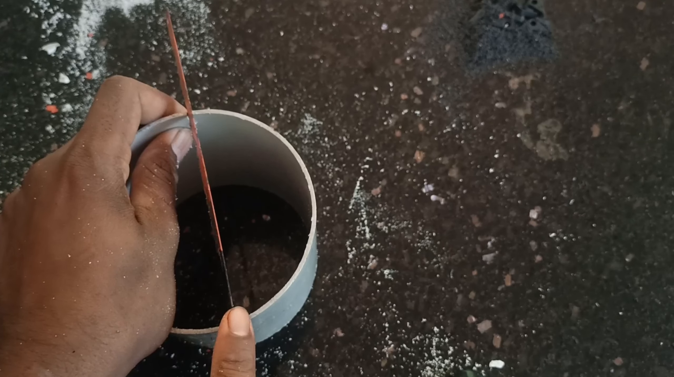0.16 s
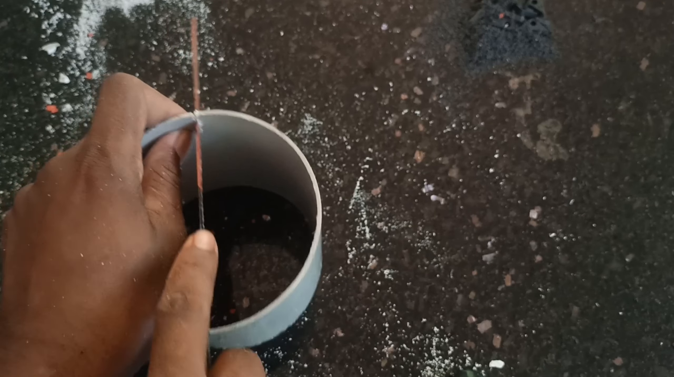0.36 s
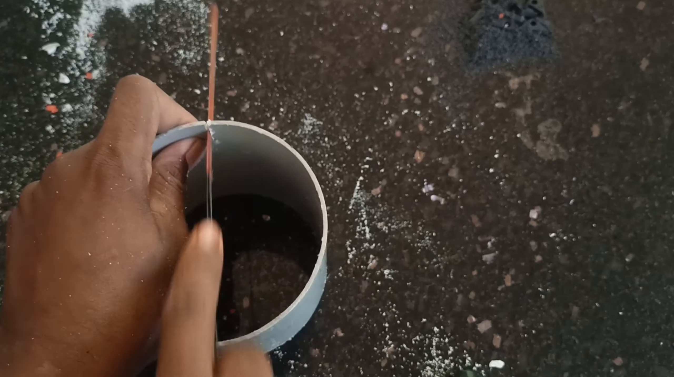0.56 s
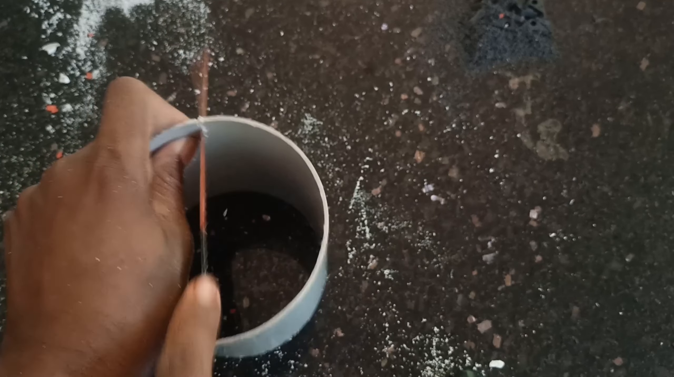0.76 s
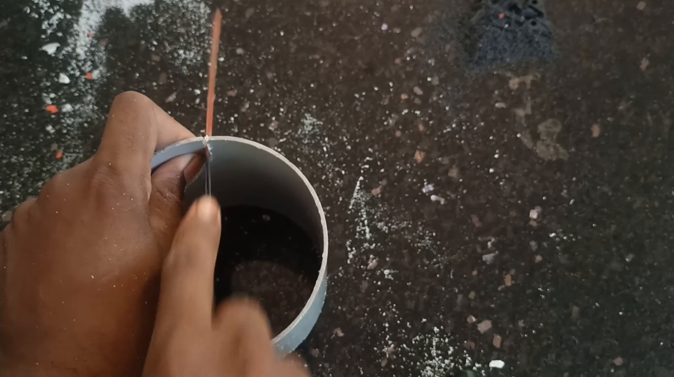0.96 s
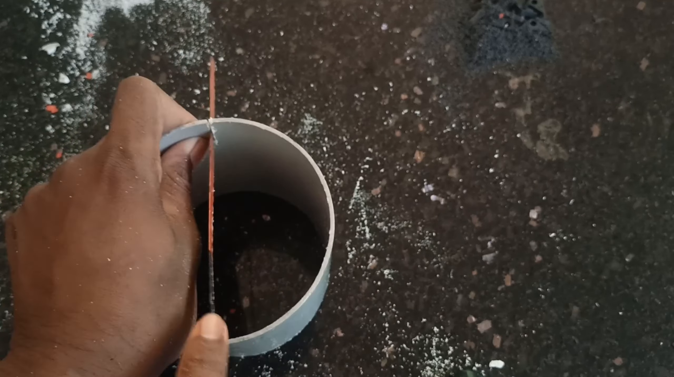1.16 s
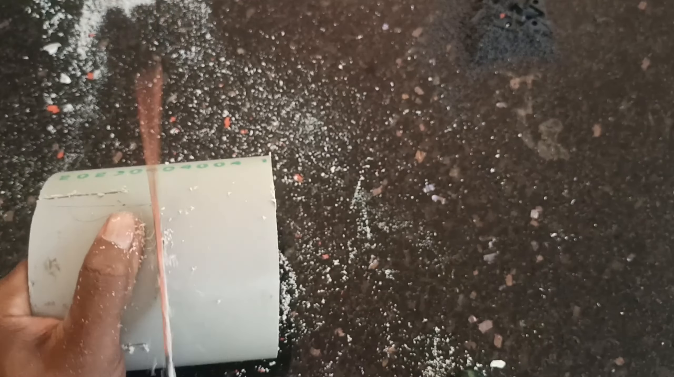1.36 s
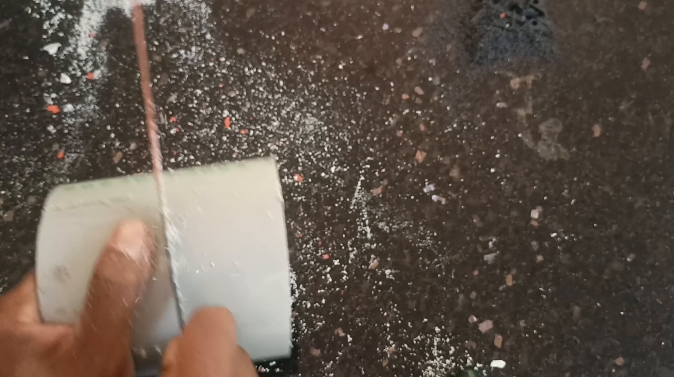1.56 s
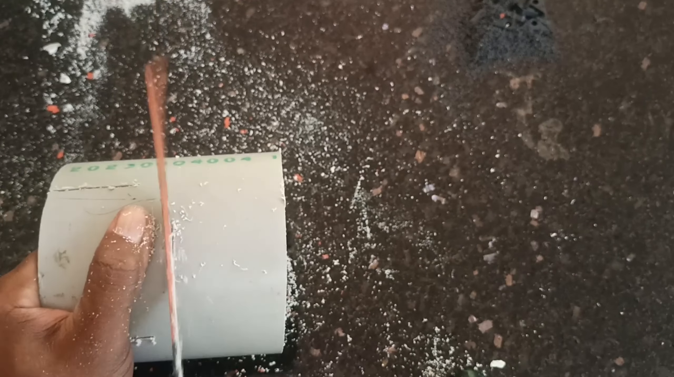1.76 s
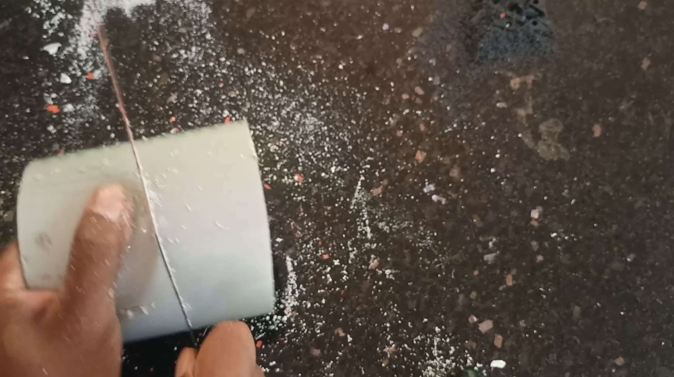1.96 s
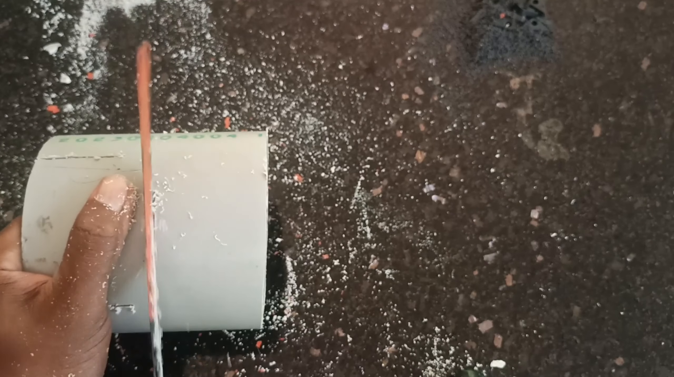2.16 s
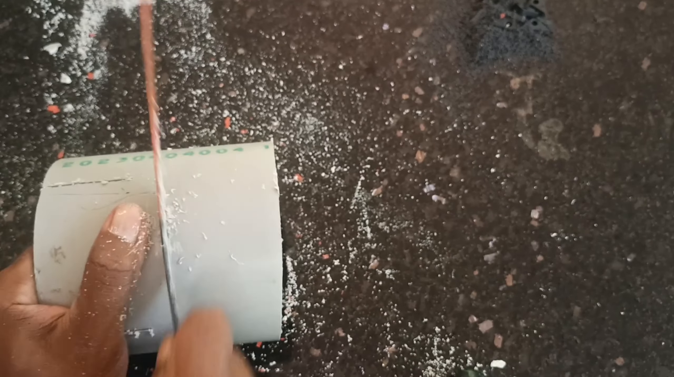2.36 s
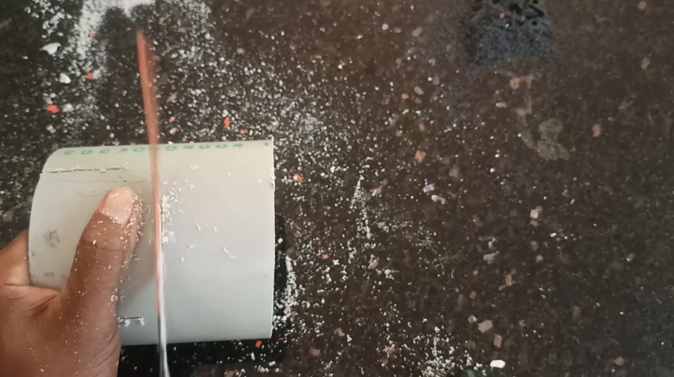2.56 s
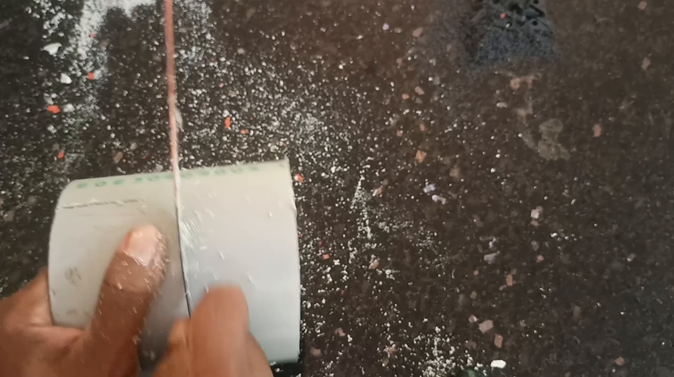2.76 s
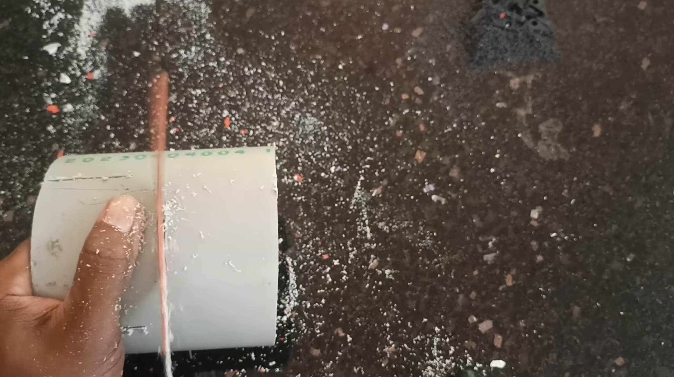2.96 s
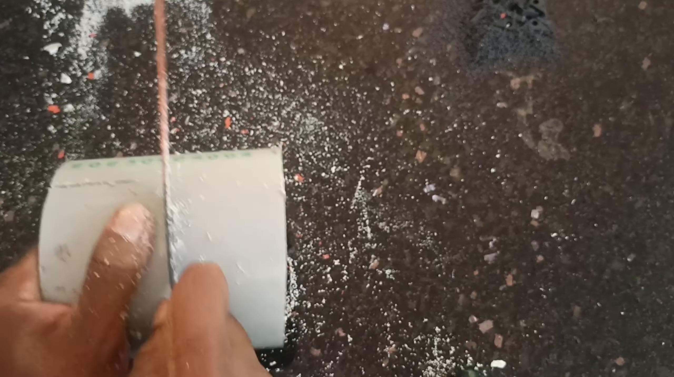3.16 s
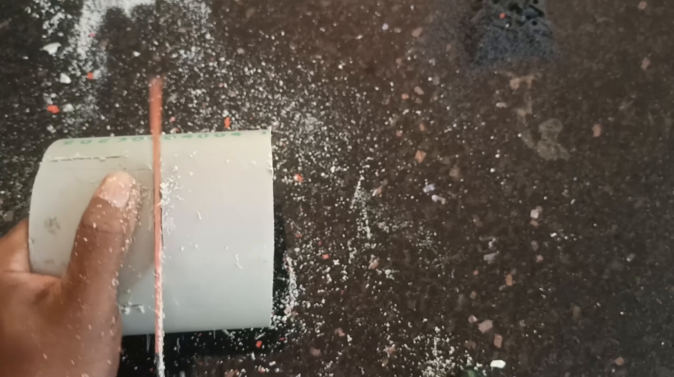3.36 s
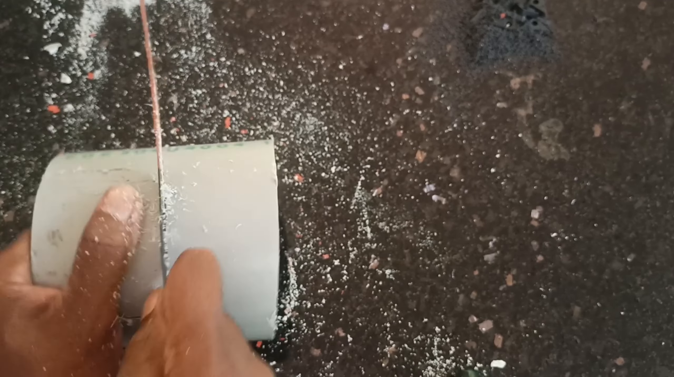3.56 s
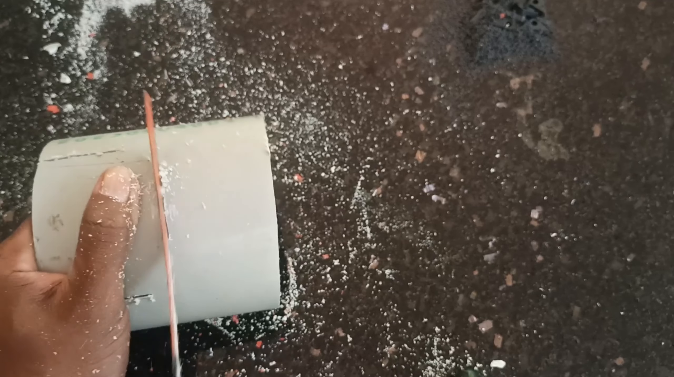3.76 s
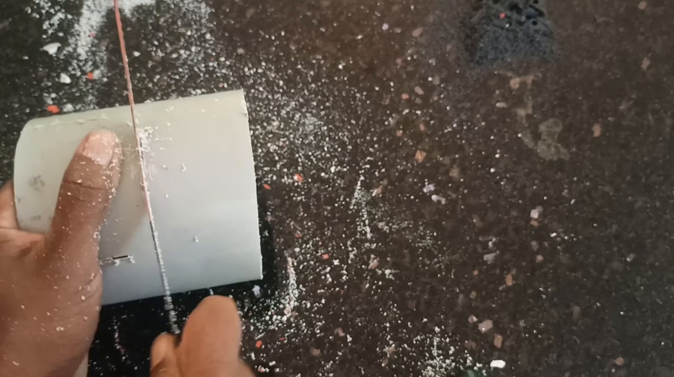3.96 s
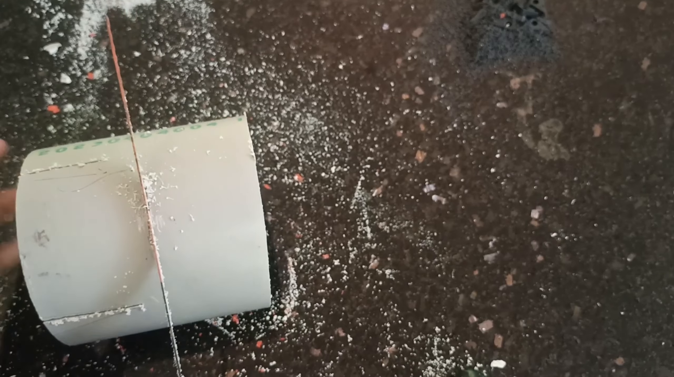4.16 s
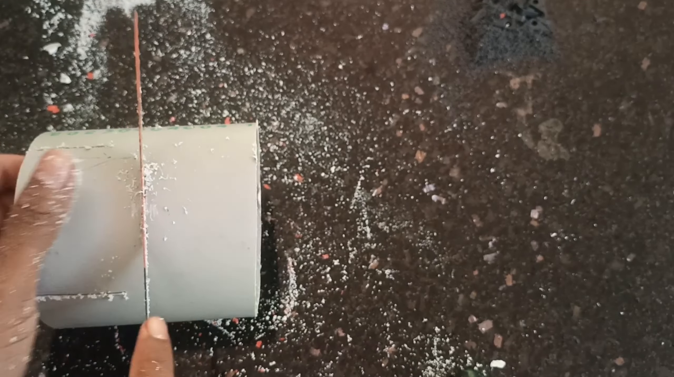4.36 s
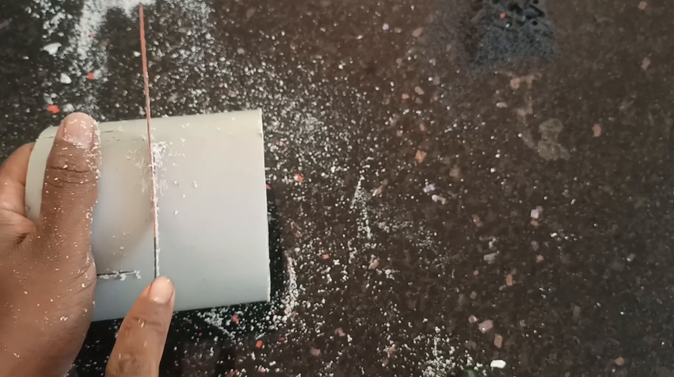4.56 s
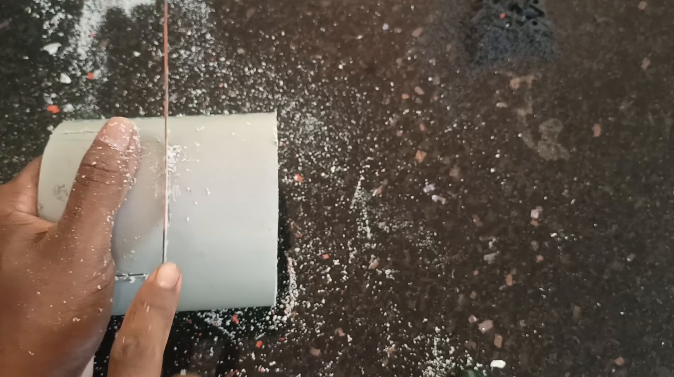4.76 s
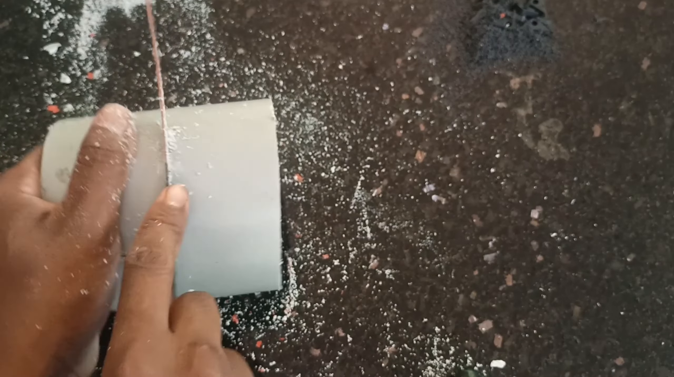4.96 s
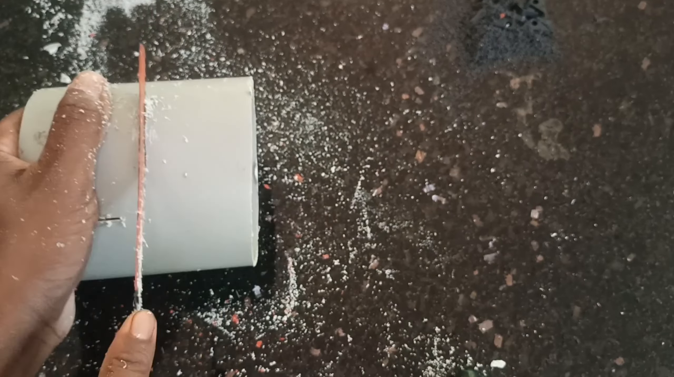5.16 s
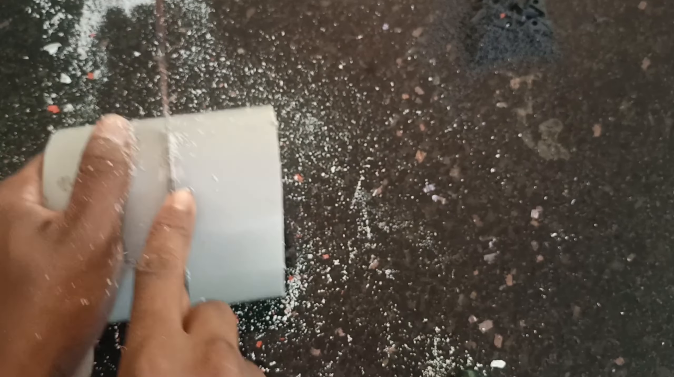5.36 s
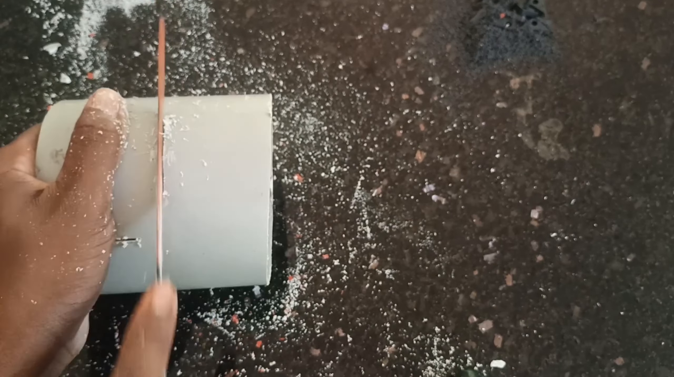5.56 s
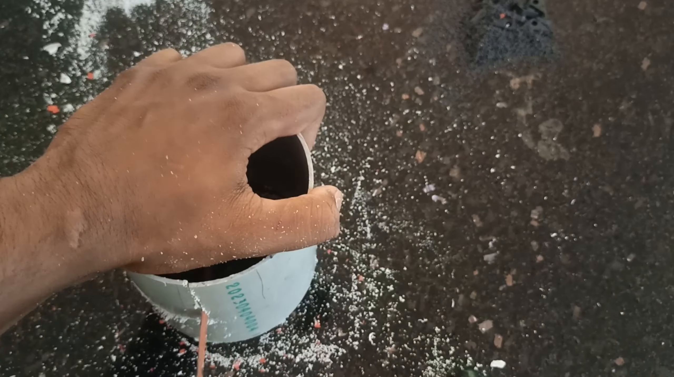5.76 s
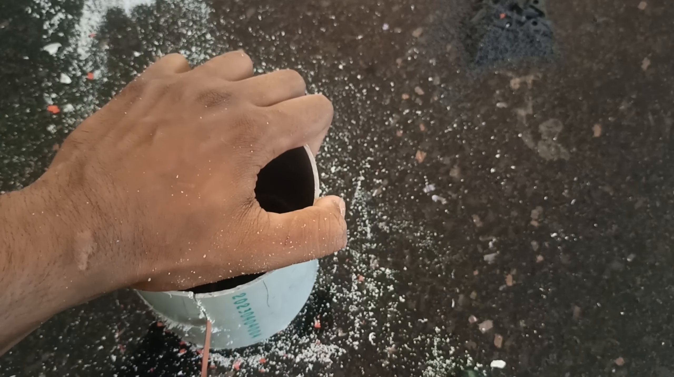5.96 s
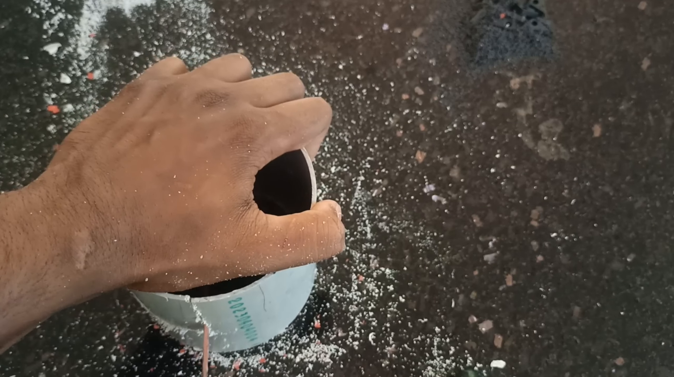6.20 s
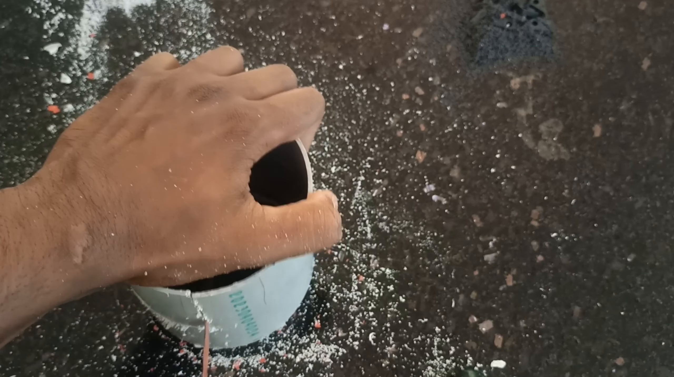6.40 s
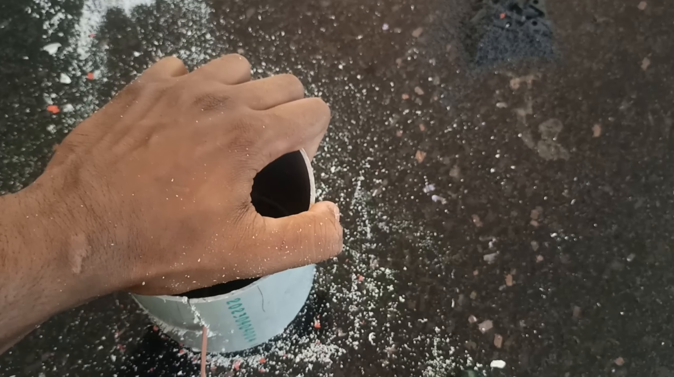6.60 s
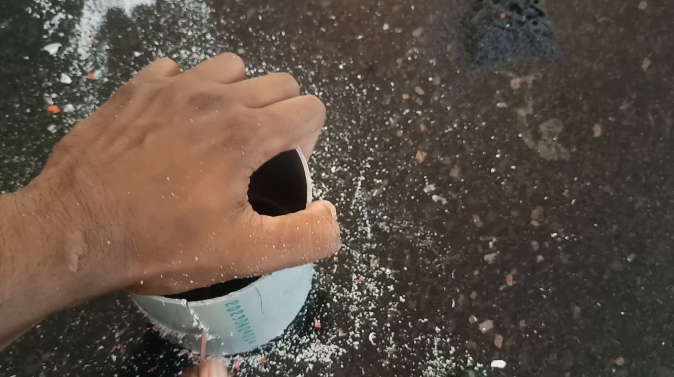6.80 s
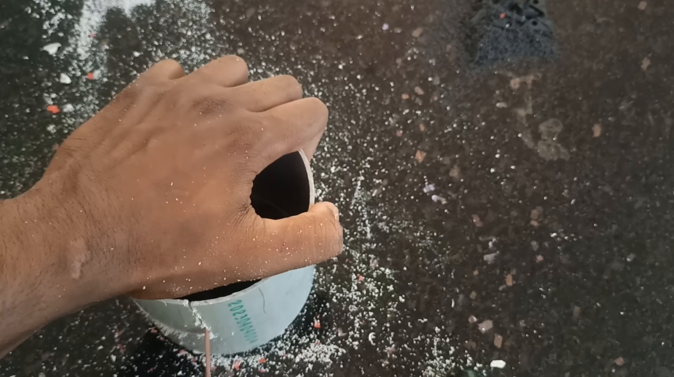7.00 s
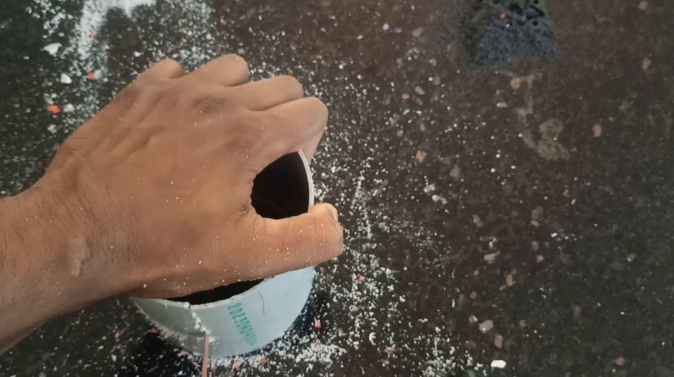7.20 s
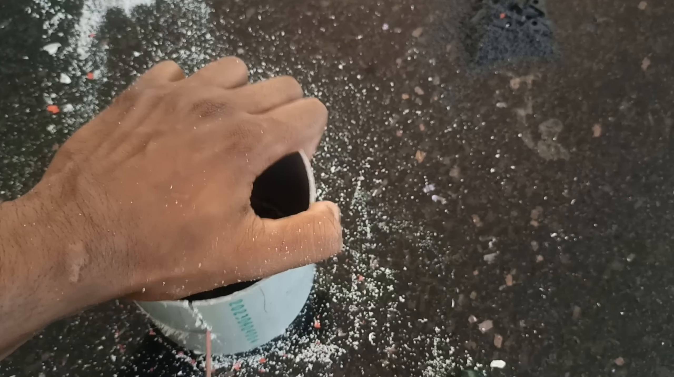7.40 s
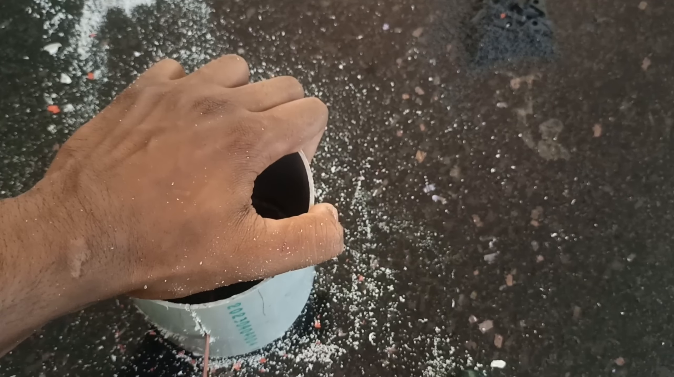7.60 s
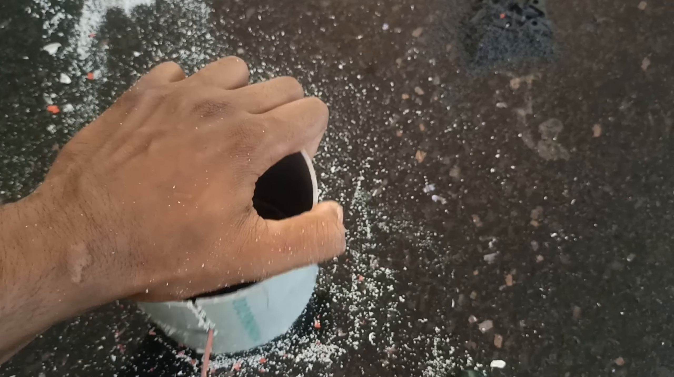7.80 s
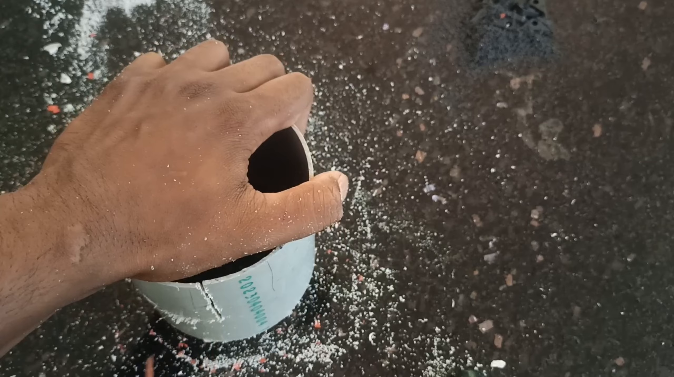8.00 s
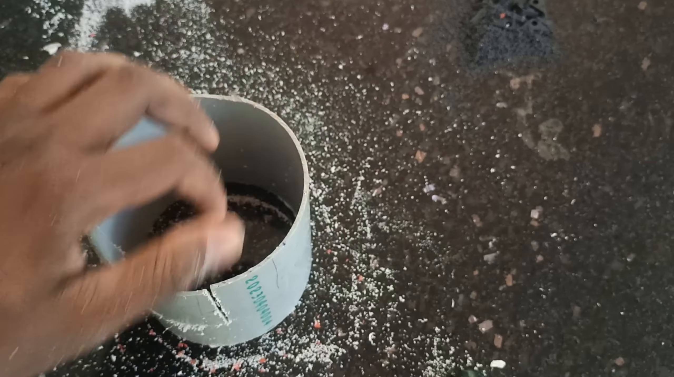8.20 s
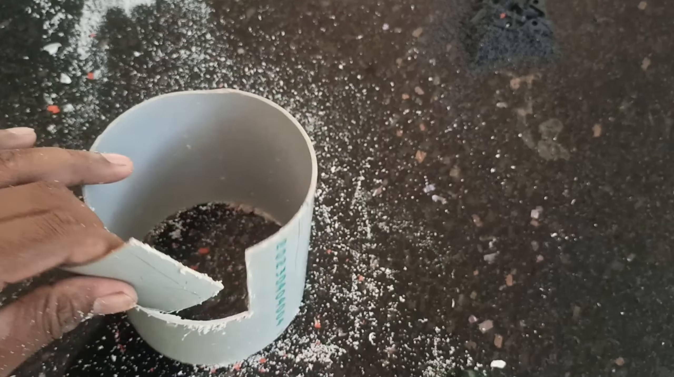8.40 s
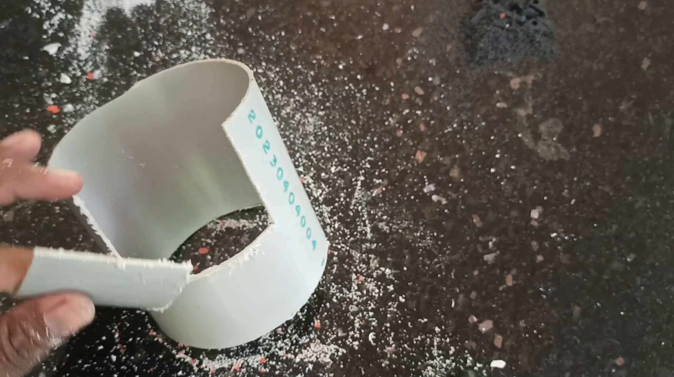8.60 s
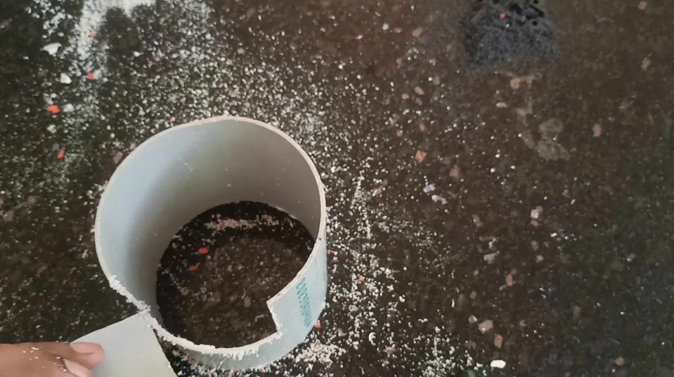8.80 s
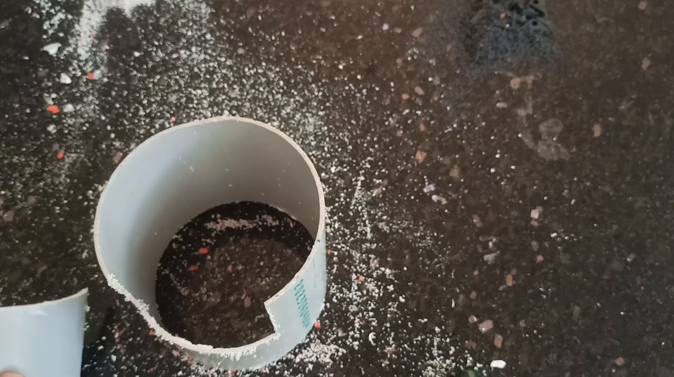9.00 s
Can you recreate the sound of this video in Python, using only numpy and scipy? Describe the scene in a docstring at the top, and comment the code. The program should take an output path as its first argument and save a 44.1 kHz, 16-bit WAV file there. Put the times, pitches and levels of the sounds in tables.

```python
"""A bare hacksaw blade saws a short plastic pipe on a hard floor, close under a one-microphone phone.
Teeth tear the plastic in dense random clicks that ring blade and pipe wall; now and then a tooth catches.
The pipe is held in four grips, each with its own resonances; the lying pipe also knocks at single pitches.
Behind it are filtered room noise with a low hum of air and a few far chirps made of two wavering tones.
Near the end the loose piece scuffs the floor, and is tapped down with two clicks that ring it."""
import sys
import numpy as np
from scipy import signal
from scipy.fft import rfft, irfft, next_fast_len
from scipy.io import wavfile
from scipy.ndimage import uniform_filter1d

SR = 44100
rng = np.random.default_rng(int(sys.argv[2]) if len(sys.argv) > 2 else 0)


def convert_level_to_amplitude(level_db):
    """Map a level in decibels to its linear amplitude factor."""
    exponent = np.asarray(level_db, float) / 20
    return 10 ** exponent


def pcm_store(signal):
    """Save signal as 16-bit PCM."""
    levels = np.round(np.clip(np.atleast_2d(signal), -1, 1) * 32767)
    wavfile.write(sys.argv[1], SR, levels.astype(np.int16).T)


N = 398663
T = np.arange(N) / SR  # time of every sample in seconds


def response(points, rings=(), size=8192):
    """Causal impulse response of a broad colour with resonant peaks, from the cepstrum of its log gain."""
    hz = np.maximum(np.arange(size // 2 + 1) * SR / size, 1)
    at, db = np.transpose(points)
    db = np.interp(np.log(hz), np.log(at), db)
    for centre, width, peak_db in rings:
        db = db + peak_db / (1 + (2 * (hz - centre) / width) ** 2)
    # folding the cepstrum onto positive times makes the sound start at once
    ceps = irfft(db * np.log(10) / 20)
    ceps[1:size // 2] *= 2
    ceps[size // 2 + 1:] = 0
    return irfft(np.exp(rfft(ceps)))


def unit_in(h, lo_hz, hi_hz):
    """Scale a response so that white noise leaves it with rms 1 between two frequencies."""
    hz = np.arange(len(h) // 2 + 1) * SR / len(h)
    power = np.abs(rfft(h)) ** 2
    in_band = (hz > lo_hz) & (hz < hi_hz)
    return h / np.sqrt(power[in_band].sum() / len(hz))


def walk(rate):
    """Random levels, a new one rate times a second, smoothed twice; their spread is near 1."""
    hold = int(SR / rate)
    steps = np.repeat(rng.standard_normal(N // hold + 1), hold)
    return 1.1 * uniform_filter1d(uniform_filter1d(steps, hold), hold)[:N]


def filtered(x, order, hz, kind):
    """Butterworth filter: keeps the lows, the highs or a band of the sound."""
    return signal.sosfilt(signal.butter(order, hz, kind, fs=SR, output="sos"), x)


# Colour of the room noise. Each row: frequency in Hz, relative level in dB per Hz.
ROOM_COLOUR = [(15, -57.5), (25, -25), (49, -15), (101, -10.5), (148, -4), (188, -11), (306, -11.5),
               (874, -23), (1270, -22.5), (2300, -26), (4200, -22.5), (6410, -23.5), (7540, -19.5),
               (10100, -30.5), (15600, -26.5)]
# Level of the room noise over time. Each row: time in seconds, level in dB before a slight waver.
ROOM_LEVELS = [(0, -47), (.1, -50.5), (1.2, -45.5), (1.3, -45), (4.05, -44.5), (4.12, -47), (4.7, -47),
               (5.6, -44.5), (7.9, -43), (8.3, -54.5), (8.74, -56.5), (8.8, -49), (9.04, -54.5)]


def background():
    """Room hiss and hum: white noise through the room colour, wavering slightly in level."""
    hiss = signal.fftconvolve(rng.standard_normal(N), response(ROOM_COLOUR))[:N]
    level_db = np.interp(T, *np.transpose(ROOM_LEVELS)) + 1.1 * walk(12)
    return hiss / hiss.std() * convert_level_to_amplitude(level_db)


# A tooth catches and lets go, or the pipe is knocked.
# Each row: time in seconds, relative rasp peak in dB, relative wall boom peak in dB.
CATCH_EVENTS = [(0.045,-46,-49),(0.3595,-26.5,-30),(0.4894,-27,-23),(.516,-22,-28),(.54,-22,-32),(0.5761,-16.5,-22),(.649,-20,-18),(0.683,-36,-20),(0.8127,-16,-21),(0.864,-22,-24),
                (0.9329,-24,-20),(.944,-21,-31),(1.001,-18.5,-26),(1.147,-34.5,-29.5),(1.306,-22.5,-50),(1.355,-15.5,-49),(1.368,-17,-44),(1.5023,-16,-50),(1.626,-16.5,-50),(1.757,-27.5,-43),(1.8865,-16,-52),
                (1.904,-22.5,-50),(1.9554,-30,-31),(2.011,-22,-28.5),(2.248,-24.5,-46),(2.2926,-15.5,-50),(2.313,-28,-40),(2.434,-23,-36),(2.569,-21,-46),(2.694,-20,-50),(2.8088,-24.5,-44),(2.835,-25,-45),(2.889,-26.5,-49.5),(2.952,-14.5,-49),
                (3.042,-22,-50),(3.174,-21.5,-51),(3.2248,-11.5,-50),(3.292,-20,-45),(3.361,-17,-42),(3.4239,-24,-30),(3.488,-21,-35),(3.614,-20.5,-40),(3.739,-22,-27),(3.809,-15.5,-29),(3.864,-19.5,-28),(3.875,-24,-32),
                (5.024,-27,-40),(5.318,-29,-41),(5.343,-33,-33),(5.363,-28,-33),(5.518,-31,-42),(5.5554,-30,-45),(5.7661,-47,-15),(5.9136,-25.5,-15.5),(6.0001,-23,-14.5),(6.048,-32,-8),(6.1019,-29,-11),(6.1282,-28.5,-13),
                (6.189,-22,-2),(6.2496,-19,-9.5),(6.266,-23.5,-14),(6.316,-32,-11),(6.357,-33.5,-8),(6.38,-21,-8),(6.509,-19,-9.5),(6.5759,-26.5,-9.5),(6.632,-48,-10),(6.7067,-25.5,-1),(6.766,-19.5,-12),
                (6.7863,-20,-9.5),(6.8506,-21,-2),(6.8923,-27,-9),(6.912,-18,-17),(6.978,-33,-9),(7.0205,-22,-9.5),(7.086,-35.5,-8.5),(7.1502,-22.5,-3.5),(7.04,-22,-12.5),(7.166,-24.5,-19),(7.174,-16,-17),(7.228,-30.5,-11),(7.298,-17,-16.5),(7.357,-23,-7),(7.407,-34,-10),
                (7.426,-16.5,-4.5),(7.451,-31,-18),(7.486,-23.5,-9),(7.497,-26.5,-8.5),(7.5509,-26,-8.5),(7.577,-22,-12),(7.68,-24,-2.5),(7.7,-18.5,-14),(7.811,-40,-20.5),(7.894,-37.5,-22),(7.901,-33,-14.5),(7.9156,-23,-10),(7.937,-41,-24),(8.106,-55,-31),
                ]


def catches(column, rise_s, fall_s, build_s=0, build_db=-9):
    """Short bursts of force: the load may build up first, lets go sharply and is quickly gone."""
    impulses = np.zeros(N)
    for row in CATCH_EVENTS:
        impulses[int(row[0] * SR)] = convert_level_to_amplitude(row[column])
    t = T[:2048]
    shape = (1 - np.exp(-t / rise_s)) * np.exp(-t / fall_s)
    force = np.convolve(impulses, shape / shape.max())[:N]
    if build_s:
        # a decay run backwards in time swells up to the catch
        swell = np.convolve(impulses[::-1], np.exp(-t / build_s))[:N][::-1]
        force = np.maximum(force, convert_level_to_amplitude(build_db) * swell)
    return force


# Each stroke of the saw, with faint fading tails at 7.797 and 7.964 seconds; the last four rows are
# the loose piece scuffing the floor.
# Each row: turn in seconds, usual time to full rasp in milliseconds, relative rasp level in dB,
# relative wall boom level in dB.
SAW_STROKES = [(.315,23.5,-36,-42.5),(.414,11,-27,-30),(0.482,25.5,-17.5,-25),(0.563,4.4,-19.5,-25),(.629,16,-18,-22),(.704,16,-18.5,-26),
               (0.774,17,-20,-23),(.862,2,-20.5,-26),(.909,4.2,-20,-25),(0.985,12,-19,-25),(1.271,2,-33,-41.5),(1.334,11,-22.5,-39.5),(1.417,2,-29.5,-40),
               (1.48,14,-29.5,-43),(1.54,4.4,-27,-40),(1.609,12,-30,-39.5),(1.671,2,-27.5,-37.5),(1.739,18.5,-23.5,-38.5),(1.808,2,-29,-42.5),(1.867,16,-24.5,-39.5),
               (1.936,2,-27.5,-40),(2.002,6,-28,-40.5),(2.07,13,-28.5,-38.5),(2.141,5.5,-29,-40),(2.2,41,-26.5,-40),(2.281,8.3,-25,-39.5),(2.346,3,-28,-42.5),
               (2.408,9.6,-21,-37),(2.473,1.6,-29,-39),(2.545,13,-27,-36.5),(2.628,2,-26,-39.5),(2.685,6,-23,-37.5),(2.747,21,-26.5,-40.5),(2.8,6.7,-23,-35),
               (2.877,8.8,-24.5,-37),(2.933,17,-23.5,-37),(3.003,13,-26,-39.5),(3.071,11,-25.5,-39.5),(3.135,12,-22.5,-36),(3.201,5.3,-24.5,-36),(3.268,20,-19.5,-36),
               (3.331,14,-24,-38),(3.398,6.8,-23.5,-33.5),(3.459,13,-23.5,-35.5),(3.525,18,-22.5,-31),(3.592,18,-19,-31.5),(3.656,2,-26,-31),(3.714,15,-21,-32.5),
               (3.777,10,-26,-32.5),(3.84,11,-25.5,-36.5),(3.914,9.6,-32.5,-38),(4.744,55,-40,-48.5),(4.856,14,-31,-36),(4.93,3,-29,-39),(4.995,20,-28,-44),
               (5.06,2,-36,-40.5),(5.136,9.8,-30,-40),(5.193,28,-26,-38),(5.275,7.5,-28.5,-39),(5.354,3.6,-30.5,-40),(5.409,16,-28.5,-37.5),(5.476,14,-26,-32),
               (5.548,6.5,-26.5,-37),(5.607,18,-28.5,-34),(5.657,1.7,-39,-25.5),(5.74,11.5,-34.5,-20),(5.813,13,-29.5,-19),(5.889,8.9,-29.5,-15.5),(5.96,13,-26,-16),
               (6.035,9.4,-28,-12.5),(6.099,2,-27,-17),(6.158,19,-27.5,-14),(6.234,12.4,-21.5,-15.5),(6.304,1.8,-31.5,-15.5),(6.352,19.6,-29,-23),(6.417,3.7,-37,-21),
               (6.485,18.3,-23.5,-17.5),(6.553,2.2,-31,-18),(6.627,4.1,-28,-21),(6.693,6.1,-29.5,-16.5),(6.753,12.4,-22.5,-19),(6.821,14,-30,-13),(6.882,22,-20.5,-17),
               (6.952,2.7,-26.5,-15.5),(7.015,22.5,-20,-14),(7.075,7.2,-31.5,-18.5),(7.146,17,-22,-14.5),(7.199,15,-28,-16),(7.264,28.5,-20.5,-13),(7.336,13,-28,-14),
               (7.404,23,-17.5,-17.5),(7.479,1.7,-32.5,-20.5),(7.54,23,-20.5,-15.5),(7.615,3,-24.5,-17),(7.676,2.7,-24,-15.5),(7.741,25.6,-22.5,-12.5),(7.797,7.8,-53,-34.5),(7.878,44,-32,-24.5),(7.964,5,-48,-47),
               (8.75,4.5,-50,-43),(8.812,15,-49.5,-63),(8.865,4.1,-53,-66),(8.965,20,-51.5,-67)]
# When the first four grips end, in seconds: upright, lying, lying turned, upright under the palm.
# After the last of them the pipe is let go.
GRIP_END_TIMES = [1.268, 4.1, 5.656, 7.96]
# How far the rasp sags at a turn below the softer of the two neighbouring rows: one value in dB for
# each of the four grips, then one for the pipe let go.
TURN_SAG = [-13.5, -11.5, -12.5, -12.5, -12]
# Turns where the blade comes to a full stop, each a time in seconds.
FULL_STOPS = [.909, 1.866, 2.003, 2.281, 2.408, 2.799, 3.071, 3.332, 3.842, 5.137, 5.74, 5.812, 5.96, 6.098,
              6.234, 6.355, 6.485, 6.628, 6.952, 7.015, 7.147, 7.405, 7.482, 7.541, 7.677]


def stroke_levels(stop_s=0.068, lifted_db=-76, boom_depth=0.77, boom_lead=0.76):
    """Rasp and boom in dB: each row speeds up from its turn, holds, and slows to a turn or a pause."""
    full_stop_db = -8.5  # extra sag of the rasp at a full stop
    slow_share, hold_s, longest_s = 0.49, 0.016, 0.077  # share of a row before slowing; seconds
    turn, rise_ms, rasp_db, boom_db = np.transpose(SAW_STROKES)
    next_turn = np.append(turn[1:], 1 + N / SR)
    # the hand slows after a share of the time, but aims to keep full speed a moment at least
    counted = np.minimum(next_turn - turn, longest_s)
    moving = np.maximum(rise_ms / 1000 + hold_s, slow_share * counted)
    slow = np.minimum(turn + moving, next_turn - 3 / SR)
    still = np.minimum(slow + stop_s, next_turn - 2 / SR)
    softer_db = np.minimum(rasp_db, np.roll(rasp_db, 1))
    rest_db = softer_db + np.take(TURN_SAG, np.searchsorted(GRIP_END_TIMES, turn))
    nearest_turn = np.abs(turn[:, None] - FULL_STOPS).argmin(axis=0)
    rest_db[nearest_turn] += full_stop_db
    # in a pause of more than 0.05 s the level falls to that of a lifted blade
    end_db = np.where(next_turn - still > .05, lifted_db, np.roll(rest_db, -1))
    rasp = np.stack([rest_db, rasp_db, rasp_db, end_db, end_db], axis=1)
    # the wall sags less at a turn than the rasp does, and takes the load before the teeth reach full speed
    boom = boom_db[:, None] + boom_depth * (rasp - rasp_db[:, None])
    boom[:, 3:] = np.where(rasp[:, 3:] == lifted_db, lifted_db, boom[:, 3:])
    levels = []
    for db, lead in ((rasp, 1), (boom, boom_lead)):
        full = np.minimum(turn + lead * rise_ms / 1000, slow - 1 / SR)
        times = np.stack([turn, full, slow, still, next_turn - 1 / SR], axis=1)
        levels.append(np.interp(T, times.ravel(), db.ravel(), left=lifted_db))
    return levels


def teeth(per_s, spread_db, hiss, lump_db, lump_rate):
    """Dense uneven clicks of tearing teeth over fine friction hiss, in lumps as the blade sticks and slips."""
    size = convert_level_to_amplitude(spread_db * np.minimum(rng.exponential(1, N), 4)) * rng.standard_normal(N)
    clicks = (rng.random(N) < per_s / SR) * size
    friction = hiss * rng.standard_normal(N)
    force = (clicks / clicks.std() + friction) * convert_level_to_amplitude(lump_db * walk(lump_rate))
    return force / force.std()


def patchy(x, patchy_db, rate):
    """The point of contact travels along the blade, so narrow bands of the force swell and fade on their own."""
    size = next_fast_len(N)
    spectrum = rfft(x, size)
    hz = np.arange(len(spectrum)) * SR / size
    place = np.log2(np.clip(hz, 250, 16000) / 250) * 4  # in quarter octaves
    out = np.zeros(N)
    for band in range(25):
        share = np.clip(1 - np.abs(place - band), 0, 1)
        out += irfft(spectrum * share)[:N] * convert_level_to_amplitude(patchy_db * walk(rate))
    return out / out.std()


def blade_modes(x, ring_db, size=512):
    """The free lengths of the blade keep changing, so many close modes flare up briefly at ever new pitches."""
    frames = signal.stft(x, nperseg=size)[2]
    flare = uniform_filter1d(rng.standard_normal(frames.shape), size=2, axis=0)  # across pitch
    flare = uniform_filter1d(flare, size=5, axis=1)  # across time
    out = signal.istft(frames * convert_level_to_amplitude(ring_db * flare / flare.std()), nperseg=size)[1][:N]
    return out / out.std()


def rasp_force(rasp_db):
    """Tearing teeth ring the blade; a catch twangs its strongest range and spits a little far treble."""
    noise = patchy(rng.standard_normal(N), 3.0, 40)
    twang = filtered(noise, 2, [3500, 7200], "band")
    spit = convert_level_to_amplitude(-5.5) * filtered(noise, 2, 10500, "high")
    burst = blade_modes(twang + convert_level_to_amplitude(-8.0) * noise + spit, 5.0)
    tearing = blade_modes(patchy(teeth(6000, 2.1, 1.1, 2.4, 330), 2.0, 60), 2.8)
    caught = catches(1, .0005, 0.0035, build_s=.003, build_db=-11)
    return convert_level_to_amplitude(rasp_db) * tearing + convert_level_to_amplitude(3.5) * caught * burst


def boom_force(boom_db):
    """Sparser clicks load the wall; at a catch it feels one soft push, flexes back and shudders."""
    load = convert_level_to_amplitude(boom_db) * patchy(teeth(1200, 1.17, 0.95, 2.8, 90), 2.8, 35)
    push = catches(2, 0.00012, 0.00021)
    flex = filtered(push, 2, [360, 800], "band")
    # the shudder swells and ebbs with the load around the catch
    shudder = catches(2, .0015, .006, build_s=.006, build_db=-3) * rng.standard_normal(N)
    return load + convert_level_to_amplitude(-8.0) * push + convert_level_to_amplitude(-7.0) * flex + convert_level_to_amplitude(-12.0) * shudder


# Broad colour of blade, pipe and microphone: one list for each of the four grips.
# Each row: frequency in Hz, relative level in dB per Hz.
BODY_COLOURS = [
    [(24, -71), (40, -42), (117, -10), (270, 0), (360, -6), (593, 2.5), (1290, -12.5), (2010, -10.5),
     (2500, -15), (3490, -11.5), (4150, -2.5), (11000, -21.5), (15600, -13.5)],
    [(24, -41), (40, -38), (241, -14), (360, -19.5), (498, -10), (884, -12.5), (1250, -18), (2120, -12.5),
     (5070, 0), (5890, -3.5), (7950, -1), (10700, -14), (14500, -3.5), (15600, -3.5)],
    [(24, -51.5), (40, -23), (133, -5.5), (369, -8), (593, 0), (724, -3.5), (1610, -12), (1820, -19),
     (3320, -5.5), (5200, -5), (6680, -8), (8150, -5.5), (9950, -18.5), (15600, -6)],
    [(24, -67), (40, -36), (318, -11.5), (408, -7), (593, -1.5), (1190, -25), (1610, -22.5), (1780, -17),
     (2400, -27.5), (5070, -21), (5750, -30), (7380, -23.5), (9950, -35), (15600, -30)],
]
# Modes of wall and blade that stand out: one list for each of the four grips.
# Each row: usual pitch in Hz, usual width in Hz, usual height in dB over the colour.
BODY_MODES = [
    [(3266, 160, 9.5), (3830, 97, 6)],
    [(499, 25, 4.5), (747, 55, 6.5), (4130, 280, 5), (5230, 290, 5)],
    [(496, 120, 4), (5200, 300, 3)],
    [(416, 61, 5.5), (520, 130, 3), (623, 150, 4.5), (1011, 130, 6.5), (1775, 110, 9.5), (2667, 150, 5),
     (3383, 210, 6), (5230, 280, 11), (6000, 200, 5)],
]
# Which of the four bodies rings: one number, counted from 0, for each grip and for the pipe let go.
BODY_OF_GRIP = [0, 1, 2, 3, 2]
# How widely hand and cut shift the modes: one value for each body, as a share of pitch.
MODE_DETUNE = [.014, .014, .014, .005]


def saw():
    """The force of the teeth, split into rasp and boom, rings the body of the grip of the moment."""
    split_hz = (1250, 1250, 1250, 1700)  # boom below, rasp above, for each body
    mode_spread = .2  # how widely the hand's damping changes a mode, as a share of its height in dB
    rasp_db, boom_db = stroke_levels()
    forces = ((rasp_force(rasp_db), "high", 2500, 12000), (boom_force(boom_db), "low", 300, 900))
    body_now = np.take(BODY_OF_GRIP, np.searchsorted(GRIP_END_TIMES, T))
    # from each turn to the next, one of three random variants of the body rings
    turn = np.transpose(SAW_STROKES)[0]
    pose_now = rng.integers(3, size=len(turn) + 1)[np.searchsorted(turn, T)]
    out = np.zeros(N)
    for k, pose in np.ndindex(len(BODY_MODES), 3):
        count = len(BODY_MODES[k])
        shift = 1 + MODE_DETUNE[k] * np.clip(rng.standard_normal(count), -2, 2)
        damp = 1 + mode_spread * np.clip(rng.standard_normal(count), -2, 2)
        modes = np.multiply(BODY_MODES[k], np.stack([shift, shift, damp], axis=1))
        body = response(BODY_COLOURS[k], modes)
        active = (body_now == k) * (pose_now == pose)
        for force, side, lo_hz, hi_hz in forces:
            part = filtered(unit_in(body, lo_hz, hi_hz), 4, split_hz[k], side)
            out += signal.oaconvolve(force * active, part)[:N]
    return out


def walls(x, t60_s, wet_db, damp_hz):
    """A small room answers with a dull, diffuse tail of decaying noise."""
    t = T[:SR // 2]
    tail = rng.standard_normal(len(t)) * convert_level_to_amplitude(-60 * t / t60_s) * (t > .004)
    tail = filtered(tail, 1, damp_hz, "low")
    return x + convert_level_to_amplitude(wet_db) * signal.fftconvolve(x, tail / np.sqrt(np.sum(tail ** 2)))[:N]


# Brief dips of the whole sound, close to two changes of grip.
# Each row: start of the lowest part in seconds, its length in seconds.
BRIEF_DIPS = [(1.268, 0.0045), (5.649, 0.01)]


def brief_dips(x):
    """The level dips briefly to a twentieth, with slopes of about a millisecond on both sides."""
    for start, length in BRIEF_DIPS:
        outside_s = np.abs(T - start - length / 2) - length / 2
        x = x * np.clip(.05 + outside_s / .001, .05, 1)
    return x


# The wall of the lying pipe knocks once, at the pitch of the spot under the blade.
# Each row: start in seconds, peak level in dB, pitch in Hz.
WALL_KNOCKS = [(1.542, -29.5, 520), (2.307, -29, 658), (2.613, -29, 527), (3.094, -25, 689),
               (3.269, -24, 527), (3.612, -25, 738), (3.783, -21.5, 549), (5.576, -23.5, 582),
               (5.618, -24, 646)]


def knocks(rise_s=0.003, t60_s=0.06):
    """Each knock is one wall mode, a sine that swells quickly and dies."""
    out, t = np.zeros(N), T[:8192]
    shape = (1 - np.exp(-t / rise_s)) * convert_level_to_amplitude(-60 * t / t60_s)
    for start, db, hz in WALL_KNOCKS:
        ring = shape / shape.max() * np.sin(2 * np.pi * hz * t)
        out[int(start * SR):][:len(t)] += convert_level_to_amplitude(db) * ring
    return out


# Far chirps. Each row: start in seconds, relative level in dB.
FAR_CHIRPS = [(4.04, -54), (4.18, -55), (4.32, -59), (4.46, -52), (4.61, -55), (7.985, -48), (8.147, -47),
              (8.314, -51), (8.508, -53), (8.672, -52), (8.838, -45), (8.985, -51)]


def chirps(high_hz=6200, low_hz=5300, low_db=-2.0, wobble=0.033):
    """Two hoarse, blurred whistles at once, sudden at the start, fading out."""
    env = np.zeros(N)
    for start, level_db in FAR_CHIRPS:
        u = (T - start) / .045  # time in units of 45 ms: the fade begins at half a unit
        env += convert_level_to_amplitude(level_db) * np.clip(u / 0.062, 0, 1) * np.exp(-2.5 * np.clip(u - .5, 0, 20))
    out = np.zeros(N)
    for hz, db, spread in ((high_hz, 0, .9), (low_hz, low_db, 1.8)):
        pitch = hz * (1 + spread * wobble * walk(1100))
        tone = np.sin(2 * np.pi * np.cumsum(pitch) / SR)
        out += convert_level_to_amplitude(db) * env * tone * convert_level_to_amplitude(3.6 * walk(400))  # fast level changes make it hoarse
    return out


# The cut piece is tapped down and bounces. Each row: time in seconds, relative click level in dB.
PIECE_TAPS = [(8.7484, -12.5), (8.7522, -23)]
# Colour of the small piece. Each row: frequency in Hz, relative level in dB.
PIECE_COLOUR = [(59, -56), (100, -23), (560, -3.5), (1900, -7), (3000, -10), (4560, 0), (5280, 1),
                (10200, -33), (15500, -24)]


def taps(crack_s=0.003, crack_db=-13):
    """A hard click with a crumb of noise rings the small plastic piece."""
    force = np.zeros(N)
    for start, db in PIECE_TAPS:
        u = T - start
        crack = (u > 0) * np.exp(-np.abs(u) / crack_s) * rng.standard_normal(N)
        force += convert_level_to_amplitude(db + crack_db) * crack
        force[int(start * SR)] += convert_level_to_amplitude(db)
    return signal.fftconvolve(force, unit_in(response(PIECE_COLOUR), 100, 12000))[:N]


def scene():
    """One microphone: both channels carry the same sound."""
    near = walls(saw() + knocks() + taps(), t60_s=0.18, wet_db=-17.5, damp_hz=4500)
    far = walls(chirps(), t60_s=0.41, wet_db=-8, damp_hz=9000)
    x = brief_dips(near + far + background())
    return np.stack([x, x])


def low_pass(x):
    """Removes everything above the highest recorded frequency."""
    return signal.sosfilt(signal.butter(12, 16840, fs=SR, output="sos"), x)


def record(dry):
    """The phone rounds the loudest peaks and cuts the top steeply."""
    rounded = 0.77 * np.tanh(dry / 1.02)
    top_cut = signal.ellip(10, .2, 70, 15550, fs=SR, output="sos")  # low-pass at 15550 Hz
    mix = signal.sosfilt(top_cut, rounded)
    return low_pass(mix)


dry = scene()
out = record(dry)
pcm_store(out)
```